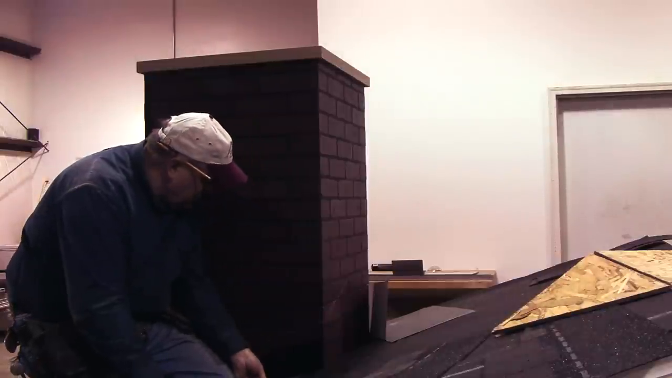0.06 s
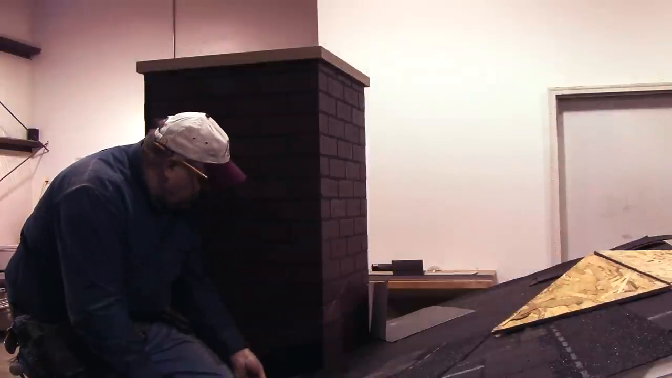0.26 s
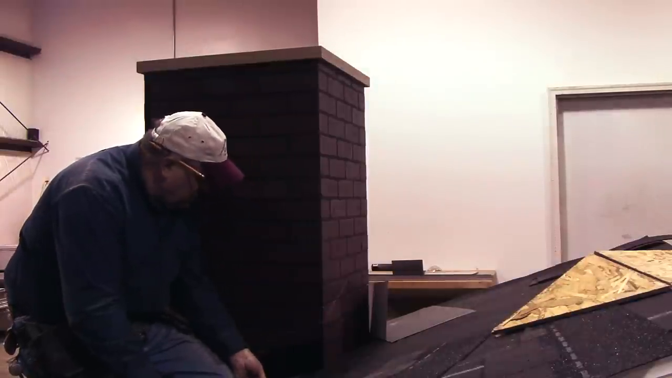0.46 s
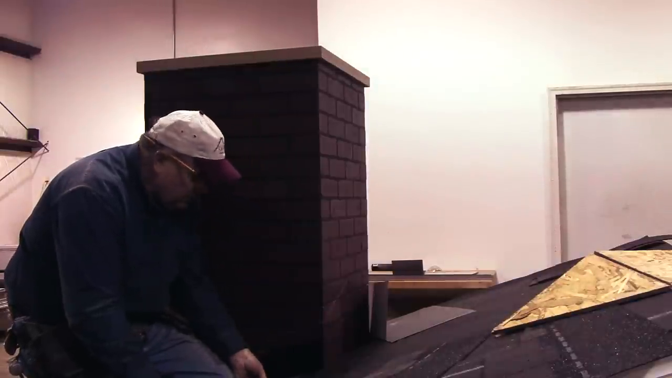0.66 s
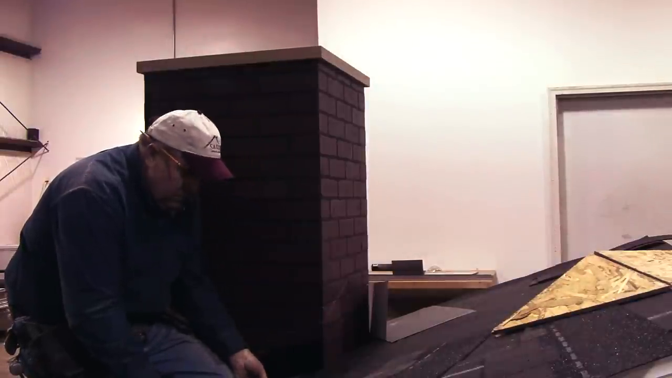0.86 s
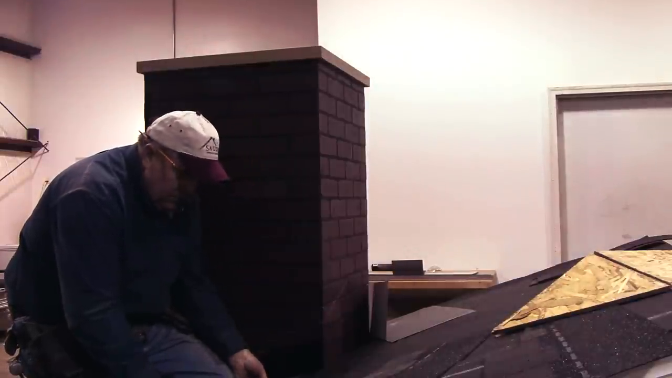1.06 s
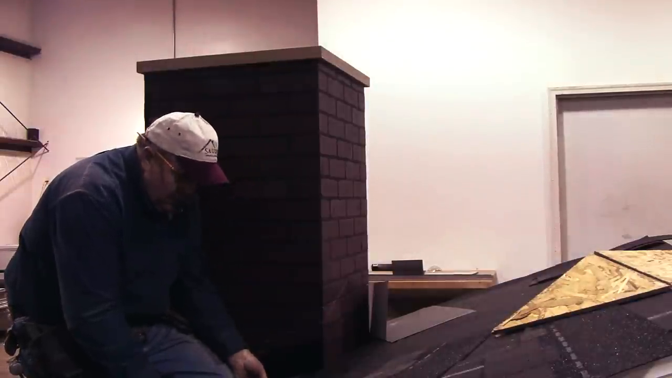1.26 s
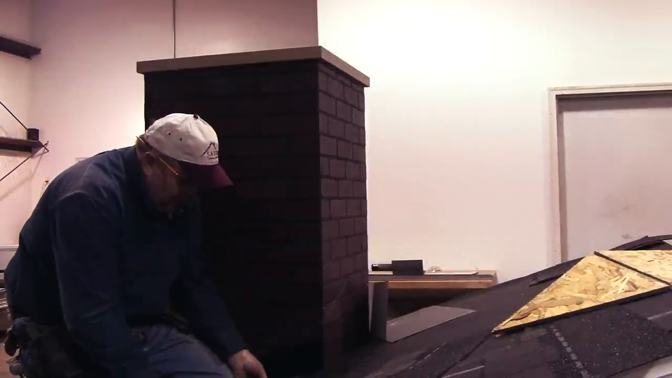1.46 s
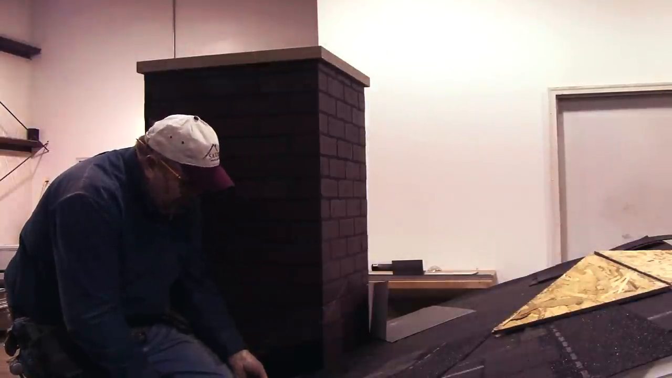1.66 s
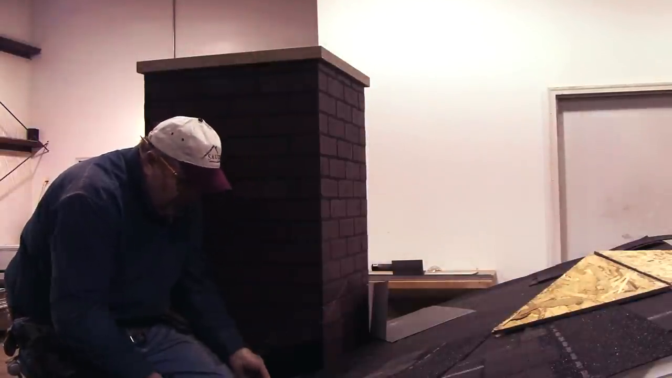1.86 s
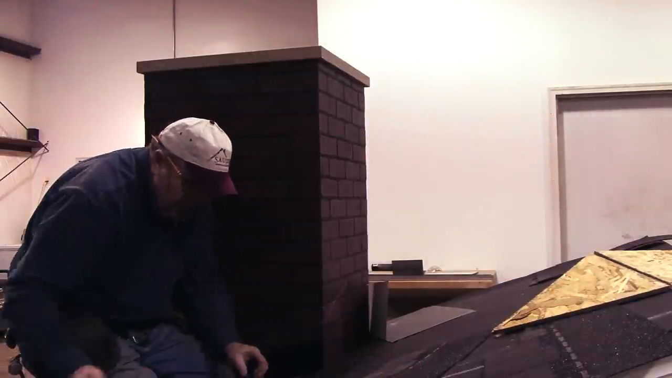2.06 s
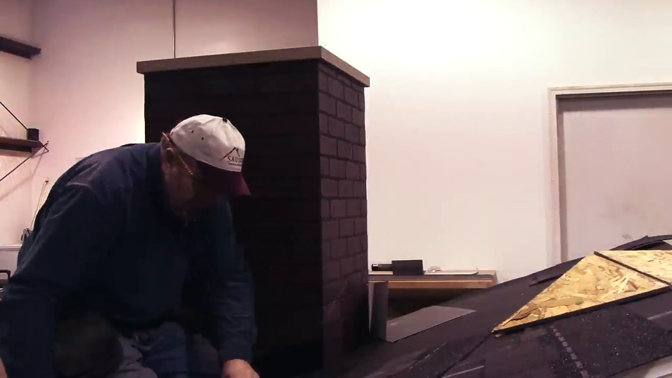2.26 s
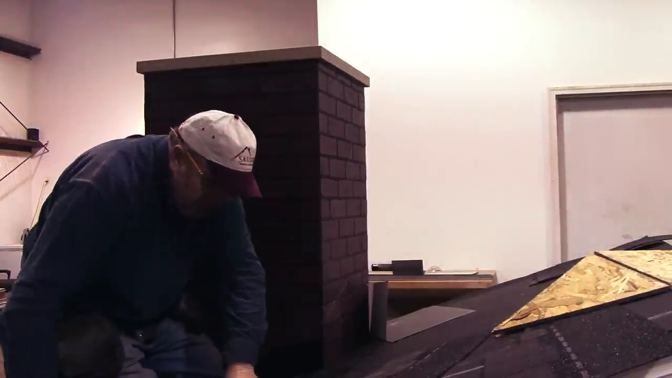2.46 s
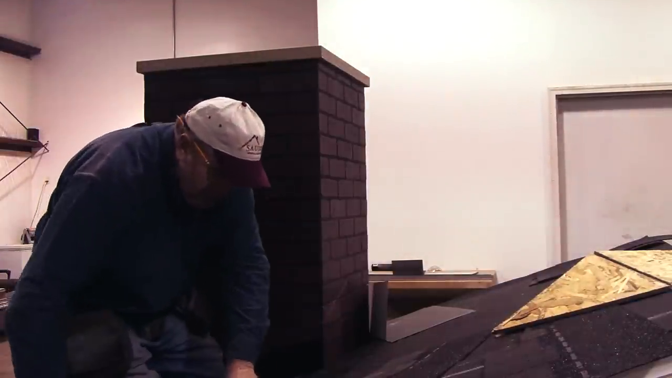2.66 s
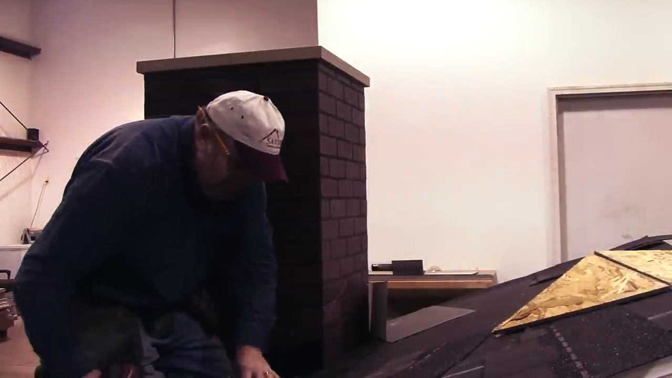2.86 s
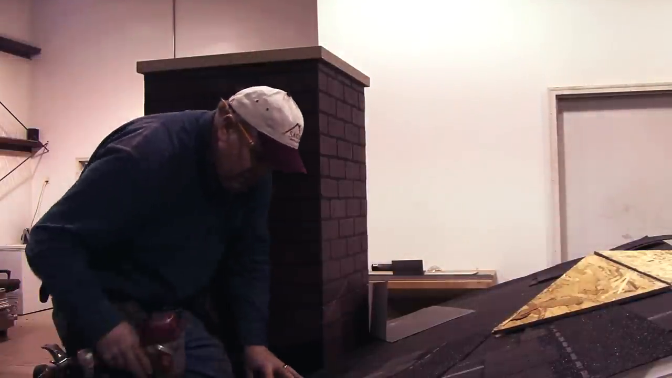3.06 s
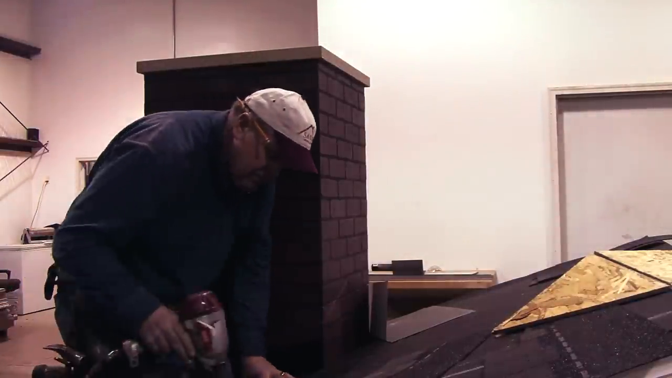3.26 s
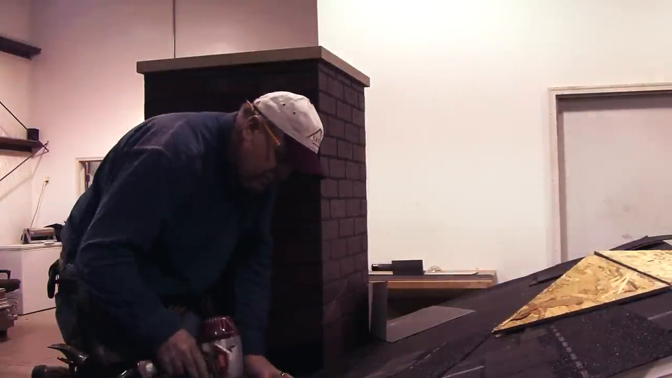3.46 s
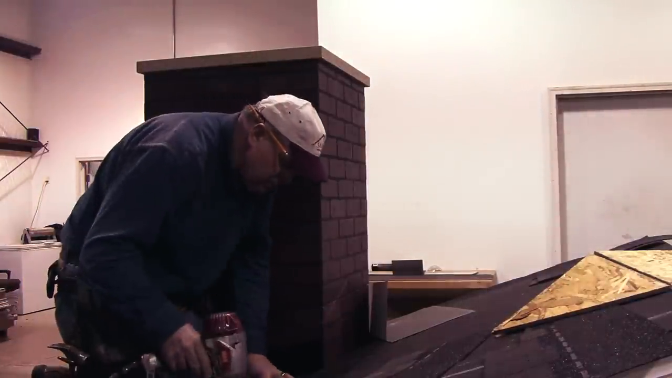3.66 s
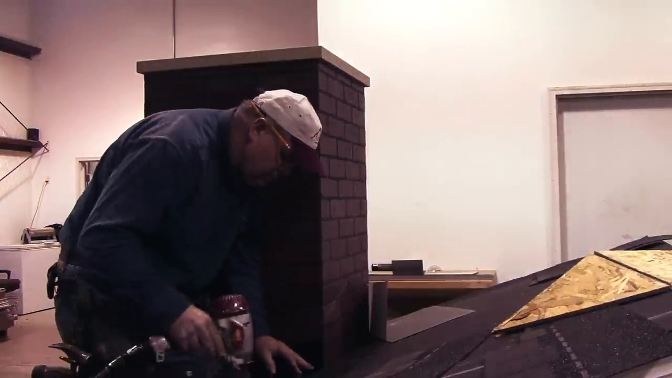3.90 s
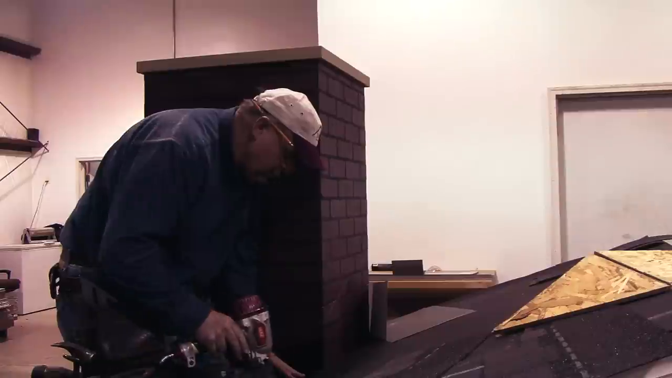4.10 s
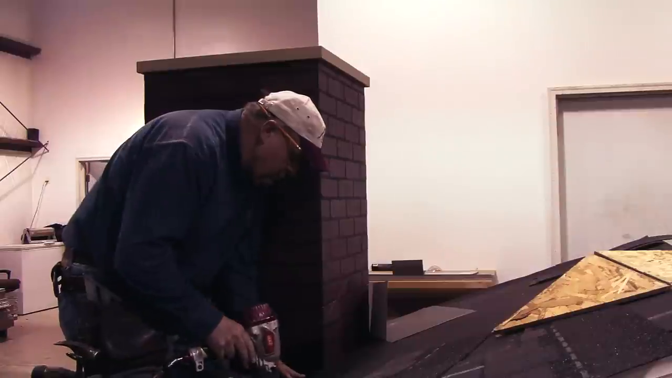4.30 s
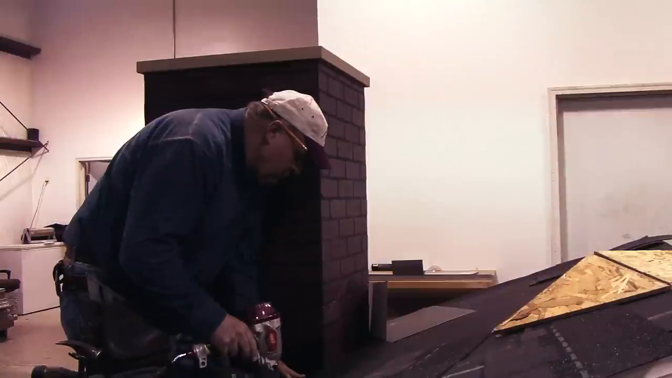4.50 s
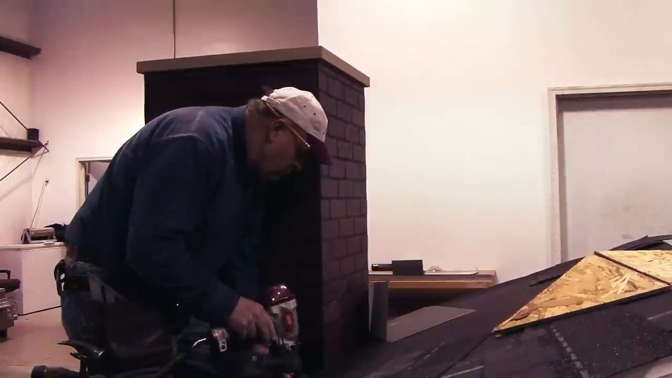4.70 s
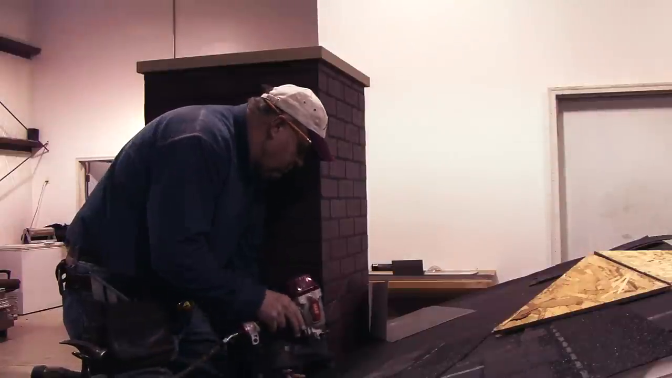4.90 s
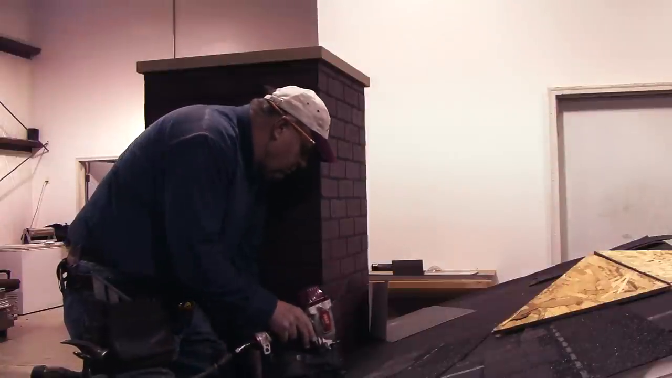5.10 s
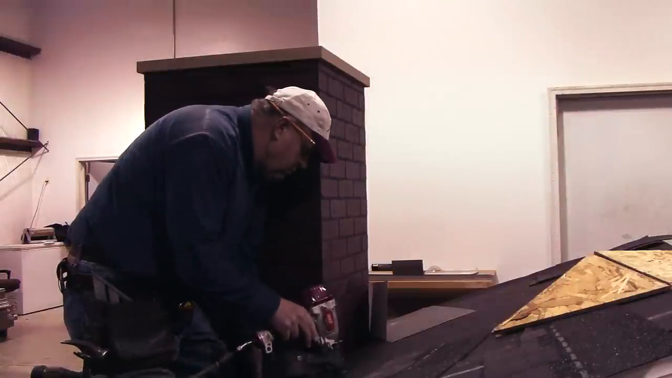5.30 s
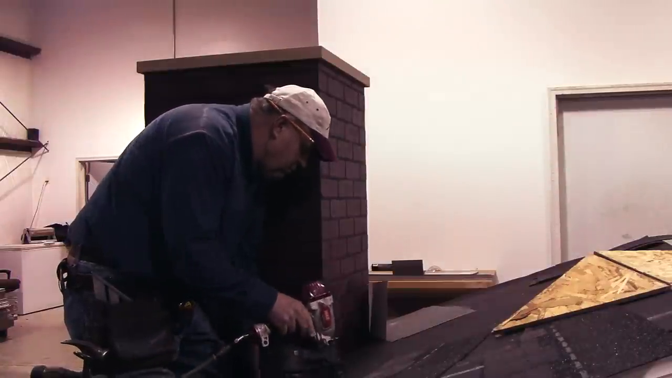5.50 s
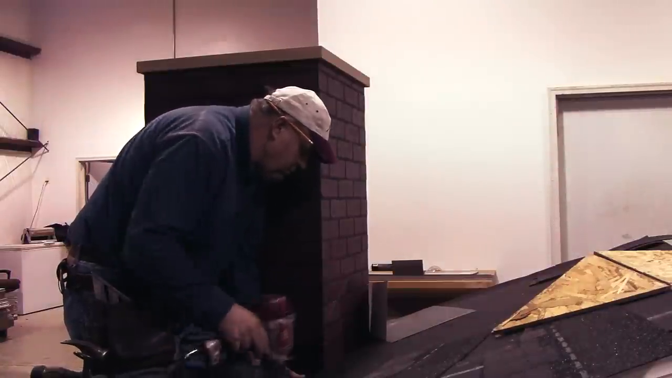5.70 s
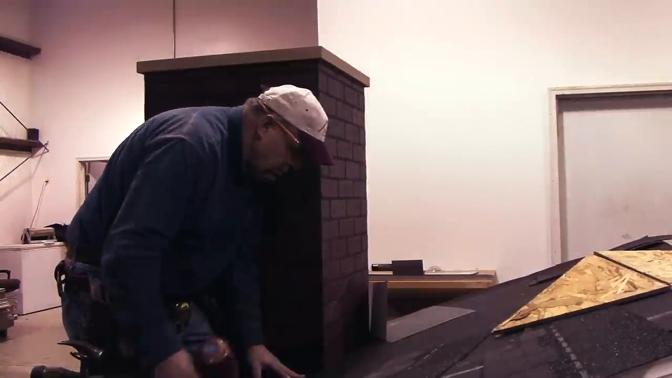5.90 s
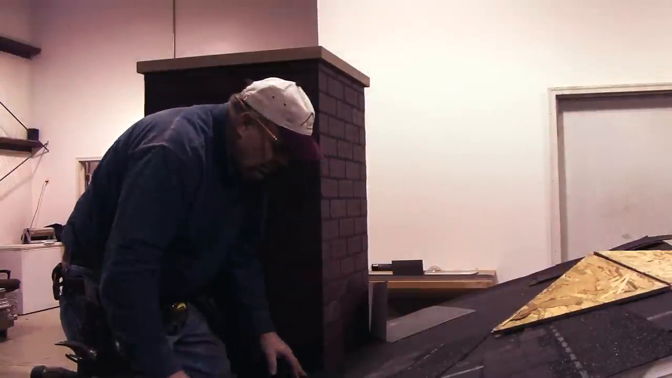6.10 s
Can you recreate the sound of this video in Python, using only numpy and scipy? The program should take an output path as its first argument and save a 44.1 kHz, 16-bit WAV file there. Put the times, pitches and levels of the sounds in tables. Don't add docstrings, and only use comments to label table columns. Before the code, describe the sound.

Gritty shingles scrape and tick quietly, then a pneumatic nail gun slams three overloaded shots into a hollow wooden deck, each trailing an air hiss.

```python
import sys
import numpy as np
from scipy import signal
from scipy.fft import rfft, irfft, next_fast_len
from scipy.io import wavfile
from scipy.ndimage import map_coordinates

SR = 44100
rng = np.random.default_rng(int(sys.argv[2]) if len(sys.argv) > 2 else 0)


def undo_db(level):
    steps = np.asarray(level, float) / 20
    return 10 ** steps


def bounce(signal):
    frames = np.transpose(np.atleast_2d(signal))
    limited = np.clip(frames, -1, 1)
    pcm = np.round(limited * 32767).astype(np.int16)
    wavfile.write(sys.argv[1], SR, pcm)


N = 271082


def unit(x):
    return x / np.sqrt(np.mean(x ** 2) + 1e-20)


def along(points, hz):
    point_hz, value = np.transpose(points)
    return np.interp(np.log(hz + 1), np.log(point_hz + 1), value)


def wobble(rate_hz):
    knots = rng.standard_normal(int(N * rate_hz / SR) + 4)
    return map_coordinates(knots, [np.arange(N) * rate_hz / SR])


def filtered(x, response):
    size = next_fast_len(len(x) + 8192)
    return irfft(rfft(x, size) * response(np.fft.rfftfreq(size, 1 / SR)), size)[:len(x)]


def noise(spectrum, size=N):
    return unit(filtered(rng.standard_normal(size), lambda f: undo_db(along(spectrum, f))))


def resonance(f, hz, width_hz):
    return 1j * f * width_hz / (hz * hz - f * f + 1j * f * width_hz)


def dying(x, t60s):
    hz, t, z = signal.stft(x, SR, nperseg=128)
    decay = undo_db(-60 * t / along(t60s, hz)[:, None])
    return signal.istft(z * decay, SR, nperseg=128)[1][:len(x)]


def onset(t, rise_s):
    return 1 - np.exp(-t / rise_s)


def add(track, start_s, x):
    part = track[round(start_s * SR):][:len(x)]
    part += x[:len(part)]


# freq_hz, level_db
AIR = [(15, -65.5), (25, -42.5), (53, -22.5), (66, -4.5), (86, -3), (148, -18), (248, -30), (413, -28),
       (728, -40), (1010, -40.5), (1090, -41), (1180, -35.5), (3480, -53), (6470, -44), (15800, -58)]
# freq_hz, width_hz, level_db
BALLAST = [(1080, 1500, -2.5), (1830, 700, -5), (3100, 500, -8.5), (6400, 550, 3)]


def workshop():
    t = np.arange(N) / SR
    hum_hz = 82.5 + 3 * wobble(12)
    hum = undo_db(-54 + 1.1 * wobble(5.3)) * np.sin(2 * np.pi * np.cumsum(hum_hz) / SR)
    mains_hz = 120.04
    comb = sum(np.cos(2 * np.pi * k * mains_hz * t + 6 * rng.random()) * undo_db(rng.normal(0, 1))
               for k in range(2, 70))
    buzz = filtered(comb, lambda f: sum(undo_db(db) * resonance(f, hz, width_hz) ** 2
                                        for hz, width_hz, db in BALLAST))
    tone = filtered(noise(AIR), lambda f: 1 - np.abs(resonance(f, 85.6, 30)))
    return hum + undo_db(-68.5) * unit(buzz) + undo_db(-62.5 + .6 * wobble(4.8)) * unit(tone)


# start_s, length_s, level_db,
# pitch_hz, width_hz
CREAKS = [(.828, .035, -50, 1490, 60), (.828, .025, -50, 920, 60), (.885, .035, -55, 1460, 50),
          (.962, .036, -52, 1430, 70), (.998, .055, -52, 1430, 70), (1, .03, -56, 940, 50),
          (2.1, .2, -64, 440, 160), (2.374, .022, -29, 1250, 450), (2.395, .035, -38, 1250, 300),
          (3.26, .14, -60, 370, 100), (3.5, .1, -45, 700, 300), (4.7, .22, -45, 480, 60),
          (4.75, .15, -49, 700, 70), (5.6, .25, -38, 480, 40)]


def creaks():
    out = np.zeros(N)
    for start_s, length_s, db, hz, width_hz in CREAKS:
        u = np.arange(0, 1, 1 / (length_s * SR))
        note = unit(filtered(rng.standard_normal(len(u)), lambda f: resonance(f, hz, width_hz) ** 2))
        add(out, start_s, undo_db(db) * 1.5 * u ** .3 * (1 - u) ** .6 * note)
    return out


# freq_hz, level_db
GRIT = [(880, -36.5), (1500, -8), (1920, -17.5), (2870, -5.5), (5830, -6.5), (8150, -5), (9920, -14),
        (12300, -14), (15800, -28)]
BODY = [(120, -48.5), (200, -13.5), (354, -4.5), (447, -2.5), (726, -1.5), (860, -1.5), (1040, -4.5),
        (2500, -7.5), (3250, -33.5), (5500, -120)]
# start_s, length_s, grit_db,
# body_over_grit_db
SCRAPES = [(0, 0.0507, -53.5, -7.5), (.109, 0.059, -49, -11.5), (.195, 0.1, -47.5, -7),
           (.35, 0.0606, -55.5, -5.5), (.433, 0.102, -55, -12), (.541, 0.0582, -49, -5.5),
           (.603, .068, -41.5, -4.5), (.817, 0.089, -53, 3), (.901, 0.0657, -44, -8.5),
           (.958, 0.1004, -55, -6), (1.091, 0.144, -52.5, -0.5), (1.24, .08, -59, 3),
           (1.321, 0.0994, -43, -8), (1.5, 0.097, -47.5, -4), (1.833, 0.092, -58, 6),
           (2.09, 0.23, -79.5, 8.5), (2.293, 0.19, -39, 1), (2.371, .026, -32.5, 0),
         (2.521, 0.049, -46.5, 3.5), (2.555, .03, -47, 3), (2.592, .14, -38.5, 2.5), (2.696, .04, -44, 0),
         (2.735, .05, -40, -4), (2.782, .29, -62, 7), (3.03, 0.1013, -54, -0.2), (3.17, .12, -49.5, 0),
         (3.4965, 0.07, -36, 0), (4.119, .024, -37, -4), (4.265, 0.0689, -40.5, -1), (5.091, .035, -37, 0),
         (5.15, 0.1134, -52.5, 2), (5.276, 0.115, -53.5, -2.2), (5.381, .36, -65, 0.3),
         (5.846, 0.0725, -33.5, -1.64), (5.879, .134, -43.5, 2), (6.015, .038, -31.5, 2),
         (6.057, 0.057, -48.5, -2.5)]


def rubbing():
    clumps = undo_db(2.4 * wobble(70))
    sizes = undo_db(4.1 * np.minimum(rng.exponential(size=N), 3.5))
    hits = rng.random(N) < 2000 / SR
    grains = unit(hits * sizes * rng.choice([-1, 1], N)) + 0.45 * rng.standard_normal(N)
    grit = unit(clumps * filtered(grains, lambda f: undo_db(along(GRIT, f))))
    body = unit(clumps * undo_db(2.19 * wobble(30)) * noise(BODY))
    grit_level, body_level = np.zeros(N), np.zeros(N)
    settle_s, settle_db = 0.238, -23
    strokes = SCRAPES
    trickles = [(start_s + length_s, settle_s, grit_db + settle_db, body_db)
                for start_s, length_s, grit_db, body_db in strokes]
    for start_s, length_s, grit_db, body_db in strokes + trickles:
        u = np.arange(0, 1, 1 / (length_s * SR))
        stroke = 1.557 * u ** 0.42 * (1 - u) ** 0.479
        add(grit_level, start_s, undo_db(grit_db) * stroke)
        add(body_level, start_s, undo_db(grit_db + body_db) * stroke)
    return grit_level * grit + body_level * body


# freq_hz, width_hz, level_db
MAGAZINE = [(1310, 105, -3), (3461, 56, 7), (4490, 610, -4.5), (5545, 143, 8), (6043, 156, 4),
            (9490, 79, -8.5)]


def drum(x):
    lift_s, set_down_s = 2.29, 2.8
    held = np.interp(np.arange(N) / SR, [lift_s - .01, lift_s, set_down_s, set_down_s + 0.0176], [0, 1, 1, 0])

    def response(f):
        modes = sum((-1) ** k * undo_db(db) * resonance(f, hz, width_hz)
                    for k, (hz, width_hz, db) in enumerate(MAGAZINE))
        return 0.619 + 0.8 * modes

    return x * (1 - held) + filtered(x * held, response)


# start_s, peak_db, pitch_hz
CATCHES = [(.0792, -36, 3220), (.1241, -21, 3540), (.2235, -29.5, 7400), (.4625, -23, 4250),
           (.622, -30, 2700), (.9228, -18.5, 5610), (1.3361, -23.5, 3820), (1.878, -32, 6800),
           (2.2935, -20, 5570), (2.372, -21, 6000), (2.4364, -14.5, 5450), (2.5332, -19, 2250),
           (3.1884, -21.5, 1250), (3.5028, -9, 4800), (4.1312, -18.5, 3780), (4.2736, -14.5, 6990),
           (5.3578, -25.5, 3990), (5.845, -11.5, 2500)]
# start_s, peak_db, pitch_hz
GRANULES = [(.1765, -36, 6930), (.2457, -33.5, 5170), (.3668, -38.5, 2200), (.448, -38.5, 1890),
            (.5492, -32, 3300), (.607, -37.5, 7900), (.6458, -28, 4250), (.6604, -31.5, 3840),
            (.83, -38, 1000), (.8804, -27, 4300), (1.1523, -23.5, 3330), (1.1763, -26, 1400),
            (1.261, -33, 1460), (1.3608, -27, 2440), (1.3877, -30.5, 1350), (1.4445, -38.5, 5170),
            (1.9445, -41, 5000)]
# start_s, peak_db, pitch_hz
RATTLES = [(2.311, -5.5, 5850), (2.348, -12, 5000), (2.5242, -24, 2300), (2.5848, -23, 2370),
           (2.5971, -16, 1310), (2.6524, -27, 1330), (2.6736, -17.5, 1890), (2.7054, -33, 5870),
           (2.7255, -24, 4600), (2.8296, -30, 1810), (2.9206, -29, 2860), (2.9332, -25.5, 2970),
           (2.958, -28, 1200), (3.171, -35.5, 2100), (3.2047, -25, 3200), (3.2518, -25, 1220),
           (3.4491, -38, 2640), (3.4985, -22, 6000), (3.5225, -9, 1550), (4.256, -34.5, 6250),
           (4.2986, -23, 7070), (4.3174, -31, 2150), (4.352, -31, 4676), (4.6385, -4, 4300),
           (5.0994, -7, 3500), (5.1218, -21, 1540), (5.3124, -34.5, 3690), (6.0196, -10.5, 1516),
           (6.0356, -10.5, 1920), (6.0708, -16.5, 6900)]
# start_s, peak_db, pitch_hz
SNAPS = [(.397, -34, 2070), (.5684, -28, 6000), (.5753, -18.5, 7420), (.852, -23, 3930), (.9409, -22, 7550),
         (1.22, -28.5, 2050), (1.5647, -23.5, 4940), (1.728, -34.5, 6300), (2.7737, -21.5, 5230),
         (2.992, -22.5, 4030), (3.24, -20, 1750), (3.693, -27.5, 7800), (4.2816, -12.5, 2923),
         (4.3896, -20.5, 4500), (4.419, -35, 1004), (5.0968, -14, 3500), (5.1763, -9.5, 3430),
         (5.2818, -21.5, 6000), (5.3018, -26.5, 5560), (5.339, -16, 4900), (5.4685, -31, 7460),
         (5.8396, -9, 2490), (6.0512, -9.5, 2920), (6.082, -15.5, 1990)]
# start_s, peak_db, pitch_hz
CLICKS = [(1.802, -44, 4000), (2.04, -46, 7500), (2.2985, -17, 6000), (2.3112, -12, 12000),
          (2.3815, -22, 9500), (2.4365, -20, 11000), (2.5243, -22, 7000), (2.5335, -20, 6000),
          (2.6558, -23, 6500), (2.6745, -19, 5000), (2.7095, -23, 5500), (2.722, -24, 6200),
          (2.7595, -25, 5400), (3.251, -21, 3300), (3.4963, -14, 11000), (3.5032, -9, 12000),
          (3.509, -14, 8500), (3.515, -13, 7000), (4.6387, 2, 4200), (5.0997, -2, 7000),
          (5.1015, -10, 11000), (5.1146, -6, 6800), (5.1208, -14, 7000), (5.3385, -13, 7000),
          (5.9385, -17, 1400)]
# start_s, peak_db, pitch_hz, t60_s
NOSE = [
    (5.1142, -2, 3200, .009),
    (3.2398, -19, 2800, .008),
]


def ticks():
    out, t = np.zeros(N), np.arange(SR // 8) / SR
    kinds = [(CATCHES, 0.0415), (GRANULES, .022), (RATTLES, .022), (SNAPS, 0.01095), (CLICKS, .005)]
    events = [(*row, t60_s) for rows, t60_s in kinds for row in rows]
    for start_s, db, hz, t60_s in events + NOSE:
        crack = rng.standard_normal(len(t)) * undo_db(-60 * t / t60_s) * onset(t, 0.05 * t60_s)
        crack += 1.3 * np.exp(-((t - .0005) / .00004) ** 2)

        def response(f):
            pitch = resonance(f, hz, 0.3 * hz) - 0.6 * resonance(f, 1.9 * hz, 0.3 * hz) + 0.286
            return pitch * resonance(f, 2600, 8700)

        crack = filtered(crack, response)
        add(out, start_s, undo_db(db - 4.0) * crack / np.abs(crack).max())
    return out


# start_s, peak_db, pitch_hz, t60_s
KNOCKS = [(0.123, -44.5, 916, 0.058), (0.8805, -40, 1950, 0.035), (0.923, -38, 1340, 0.056),
          (0.923, -38, 2900, 0.04), (2.3115, -20, 1700, 0.02), (2.349, -27, 3300, 0.04),
          (3.1905, -31, 1200, .035), (3.24, -11, 1700, .013), (3.523, -16, 700, .045),
          (5.851, -20, 2500, .03), (2.35, -19, 1300, 0.028), (2.906, -34.5, 614, 0.05),
          (2.934, -27, 660, 0.08), (4.6392, -4.5, 1700, 0.018), (4.6395, -7.5, 2350, 0.022),
          (6.021, -19, 757.8, 0.063)]


def knocks():
    out, t = np.zeros(N), np.arange(SR // 8) / SR
    for start_s, db, hz, t60_s in KNOCKS:
        modes = np.sin(2 * np.pi * hz * t) + .35 * np.sin(2 * np.pi * 1.19 * hz * t)
        add(out, start_s, undo_db(db - 60 * t / t60_s) * onset(t, 0.0006) * modes)
    return out


# freq_hz, level_db, t60_s
DECK = [(209.84, -4, 0.1174), (265.5, -3, 0.1277), (311.06, 1.5, 0.084), (397.6, 6.5, 0.0384),
        (465.2, -2.5, 0.072), (565, -1.5, 0.076), (714, -7.5, 0.052)]
RAFTERS = [(61.9, -5.5, 0.2), (93.68, -8.5, 0.39), (126.5, -2, 0.19), (160, 3, 0.1655)]


def ring(modes, rise_s, length=1):
    t = np.arange(SR // 3) / SR
    x = sum(undo_db(db + rng.normal(0, 1) - 60 * t / (t60_s * length)) * np.sin(2 * np.pi * hz * split * t)
            for hz, db, t60_s in modes for split in 1 + 0.0374 * rng.normal(size=2))
    x = x * onset(t, rise_s)
    return x / np.abs(x).max()


def punch(db, hz, rise_s, t60_s, size=SR // 20):
    t = np.arange(size) / SR
    return -undo_db(db - 60 * t / t60_s) * onset(t, rise_s) * np.sin(2 * np.pi * hz * t)


# start_s, peak_db, boom_over_peak_db, ring_length_share
THUDS = [(2.346, -31.5, -19.5, 0.573), (2.44, -42, 1, 0.86), (2.593, -45.5, -23, 0.9),
         (2.687, -38, -3.5, 0.59), (3.237, -41, -13, 2.2), (3.498, -26, 0, 0.497), (3.521, -19, -1, 0.707),
         (4.276, -34, 0, 1.08), (4.301, -41, 6, 1.6019), (5.098, -14, -9.5, 1.24), (5.117, -15, -6.5, 1.61),
         (5.357, -29.5, -14.5, 0.473), (5.843, -28.5, -7, 1.53), (6.021, -40, 3, 0.7), (6.051, -41, 4, 0.6)]
# start_s, level_db, pitch_hz
PUSHES = [
    (3.522, -17.5, 160),
    (4.3, -33.5, 149.8),
    (5.1154, -6.5, 148.8),
]


def thumps():
    out, t = np.zeros(N), np.arange(SR // 8) / SR
    for start_s, db, boom_db, length in THUDS:
        boom = undo_db(boom_db) * ring(RAFTERS, 0.012, length)
        add(out, start_s, undo_db(db) * (ring(DECK, 0.0053, length) + boom))
        slap = undo_db(db - 13 - 60 * t / (0.09 * length)) * onset(t, 0.003)
        add(out, start_s, slap * noise(BODY, size=len(t)))
    for start_s, db, hz in PUSHES:
        add(out, start_s, 2 * punch(db, hz, rise_s=0.004, t60_s=0.052, size=len(t)))
    return out


# freq_hz, level_db
HISS = [(1060, -37.5), (1800, -12), (2120, -11.5), (2360, -10), (3050, -6.5), (3400, -6), (3930, -3.5),
        (8900, 2), (13300, -11), (15200, -13), (15800, -22)]
RUSH = [(120, -43.5), (200, -18), (474, -6.5), (570, -10.5), (629, -7.5), (3800, -9), (4940, -41.5),
        (8360, -120)]
# freq_hz, slope_db_per_s
FADE = [(2000, 14.5), (7000, 1.5), (9500, -37), (12000, -48.5), (15500, -71)]
# hiss_db, rush_over_hiss_db, rush_drift_db_per_s
TAILS = [
    (-23.5, -6.5, -38),
    (-23.5, -14.5, -24),
    (-23.5, -4.5, 0.5),
]
TAIL_AFTER_S = 0.0575


def shot_tails():
    hz, t, z = signal.stft(noise(HISS), SR, nperseg=256)
    starts = np.array([0] + [exhaust_s + TAIL_AFTER_S for _, _, exhaust_s, *_ in SHOTS])
    since_s = t - starts[np.searchsorted(starts, t + .02) - 1]
    hiss = signal.istft(z * undo_db(along(FADE, hz)[:, None] * since_s), SR, nperseg=256)[1][:N]
    rush = filtered(noise(RUSH), lambda f: 1 + 1.3 * resonance(f, 3100, 150))
    flutter_db, lumps_db = .8 * wobble(25), .9 * wobble(30)
    rise_s, droop_db_per_s2 = .02, 112
    leak_s, leak_db = .027, -27.5
    hiss_level, rush_level, u = np.zeros(N), np.zeros(N), np.arange(SR) / SR
    for (_, driver_s, exhaust_s, *_), (db, rush_db, drift), bumper_s in zip(SHOTS, TAILS, BUMPER_S):
        droop_db = droop_db_per_s2 * np.maximum(u - rise_s, 0) ** 2
        strength = np.minimum(u / rise_s, 1) * undo_db(db - droop_db)
        start_s = exhaust_s + TAIL_AFTER_S - rise_s
        add(hiss_level, start_s, strength)
        add(rush_level, start_s, strength * undo_db(rush_db + drift * u))
        leak_start_s = driver_s + bumper_s + leak_s
        add(rush_level, leak_start_s, undo_db(leak_db) * (u < exhaust_s - leak_start_s))
    return undo_db(flutter_db) * (undo_db(0.62) * hiss_level * hiss + undo_db(0.6 + lumps_db) * rush_level * rush)


# freq_hz, level_db
STEEL = [(900, -37.5), (1800, -11), (3000, -9.5), (4500, -7.5), (6000, 2), (8000, 2), (10500, -6),
         (15800, -12)]
BOARD = [(88, -33), (150, -4.5), (833, -7), (1440, -8), (1960, -5.5), (2120, -10.5), (3320, -6),
         (3520, -7.5), (8290, -18.5), (15800, -17)]
# freq_hz, t60_s
BOARD_T60 = [(150, 0.061), (600, 0.156), (2500, 0.078), (8000, 0.046), (15000, .03)]


def blow(kind, more_db):
    *levels_db, t60_s, share = kind
    steel_db, board_db, deck_db = np.add(levels_db, more_db)
    t = np.arange(SR // 3) / SR
    stroke_s = .004
    steel = undo_db(steel_db - 60 * np.maximum(t - stroke_s, 0) / t60_s) * (1 - np.exp(-(t / .0007) ** 2))
    steel = steel * noise(STEEL, size=len(t))
    board = undo_db(board_db) * onset(t, 0.002) * dying(noise(BOARD, size=len(t)), BOARD_T60)
    deck = ring(DECK, 0.004, share) + undo_db(-13.5) * ring(RAFTERS, 0.0018)
    return steel + board - undo_db(deck_db) * deck


# freq_hz, level_db
JET = [(710, -14), (1200, -18), (1690, -12.5), (2930, -9.5), (3230, -16), (3680, -11), (4100, -7),
       (5140, -9.5), (6240, -3), (7500, -3), (8250, 2.5), (9000, -3.5), (10200, -7.5), (15800, -8.5)]


def jet(kind, more_db, opening_s=.003):
    hold_s, db, t60_s = kind
    t = np.arange(SR // 3) / SR
    strength = onset(t, opening_s) * undo_db(-60 * np.maximum(t - hold_s, 0) / t60_s)
    return undo_db(db + more_db) * strength * noise(JET, size=len(t))


# valve_s, driver_s, exhaust_s, recoil_after_bumper_s, recoil_db
SHOTS = [
    (3.713, 3.7272, 3.774, 0.0256, -12),
    (4.5292, 4.5374, 4.6495, 0.0212, -21.5),
    (5.505, 5.5143, 5.56, .019, -6),
]
BUMPER_S = [.0116, .0104, .0107]
# driver_steel_db, bumper_board_db, cushion_db, valve_db
NAILS = [
    (-0.5, 0, -5.5, -2.5),
    (3, -2.5, -2.5, 1),
    (-2, 3.5, 3, 1.5),
]
# over_kind_db, opening_s
VENTS = [
    (0, .0012),
    (0, .005),
    (-.5, .002),
]
# steel_db, board_db, deck_db, steel_t60_s, deck_ring_share
DRIVER = (2, -16.5, -8, .018, 0.42)
BUMPER = (-3, 3.5, -4.5, .05, 0.88)
RECOIL = (-3, 0, -2.5, 0.0048, 0.36)
RETURN = (-30, -13.5, -13, .03, 0.67)
# hold_s, level_db, fall_t60_s
VALVE = (.007, -14, 0.033)
EXHAUST = (.024, -3, .058)
CUSHION = (0.0074, -12, .075)


def nailer():
    out = np.zeros(N)
    for shot, nail, bumper_after_s, vent in zip(SHOTS, NAILS, BUMPER_S, VENTS):
        valve_s, driver_s, exhaust_s, recoil_after_s, recoil_db = shot
        steel_db, board_db, cushion_db, valve_db = nail
        vent_db, opening_s = vent
        bumper_s, return_s = driver_s + bumper_after_s, exhaust_s + .0335
        add(out, valve_s, jet(VALVE, valve_db))
        add(out, driver_s - .0005, punch(13.5, 480, rise_s=.003, t60_s=.0105))
        add(out, driver_s, blow(DRIVER, [steel_db, 0, 0]))
        add(out, bumper_s - .0003, punch(15, 520, rise_s=.005, t60_s=.017))
        add(out, bumper_s, blow(BUMPER, [0, board_db, 0]))
        add(out, bumper_s + recoil_after_s, blow(RECOIL, [recoil_db] * 3))
        add(out, exhaust_s, jet(EXHAUST, vent_db, opening_s))
        add(out, return_s, blow(RETURN, [0, 0, 0]))
        add(out, return_s, jet(CUSHION, cushion_db))
    return out


# freq_hz, t60_s
ROOM_T60 = [(100, 0.432), (500, 0.454), (2000, 0.47), (6000, 0.366), (14000, 0.259)]


def room(x):
    out = np.zeros(N)
    for start_s in np.arange(0, N / SR, .5):
        tail = dying(rng.standard_normal(SR // 2), ROOM_T60)
        piece = x[round(start_s * SR):round((start_s + .5) * SR)]
        add(out, start_s + .008, signal.fftconvolve(piece, tail / np.linalg.norm(tail)))
    return out


def scene():
    gun = nailer()
    hands = ticks() + thumps() + knocks() + drum(rubbing()) + creaks()
    walls = room(undo_db(-13) * gun + undo_db(-14.5) * hands)
    mono = gun + hands + walls + shot_tails() + workshop()
    return np.array([mono, mono])


def top_dropped(x, floor_db):
    hz, _, z = signal.stft(x, SR, nperseg=1024)
    top = hz > 14800
    faint = np.mean(np.abs(z[top & (hz < 15900)]) ** 2, 0) < undo_db(floor_db) ** 2
    return signal.istft(z * ~(top[:, None] & faint), SR, nperseg=1024)[1][:N]


def band_limit(x):
    return signal.sosfilt(signal.butter(12, 15910, fs=SR, output="sos"), x)


def record(dry):
    x = dry[0] / (1 + np.abs(dry[0] / .97) ** 14) ** (1 / 14)
    load = signal.lfilter([1 / (0.0228 * SR)], [1, 1 / (0.024 * SR) - 1], x * x)
    drift = filtered(x * x, lambda f: resonance(f, 11, 35) / (1 + 1j * f / 30))
    x = x / (1 + 0.9 * load) - 0.18 * drift
    x = filtered(top_dropped(x, floor_db=-103), lambda f: np.clip((16150 - f) / 400, 0, 1) ** 2)
    return band_limit(np.array([x, x]))


dry = scene()
out = record(dry)
bounce(out)
```